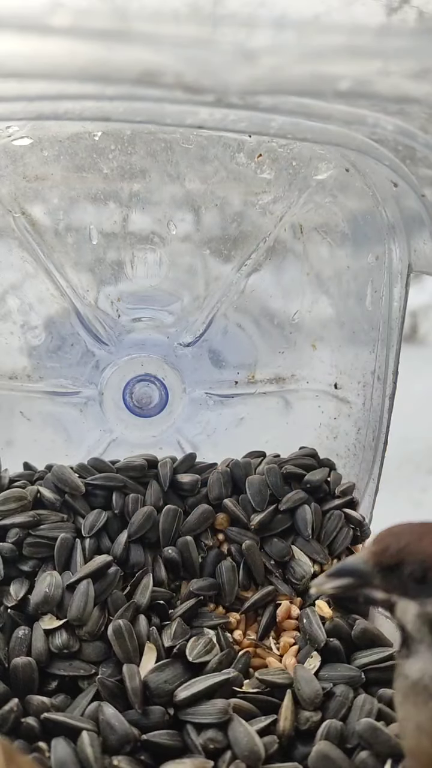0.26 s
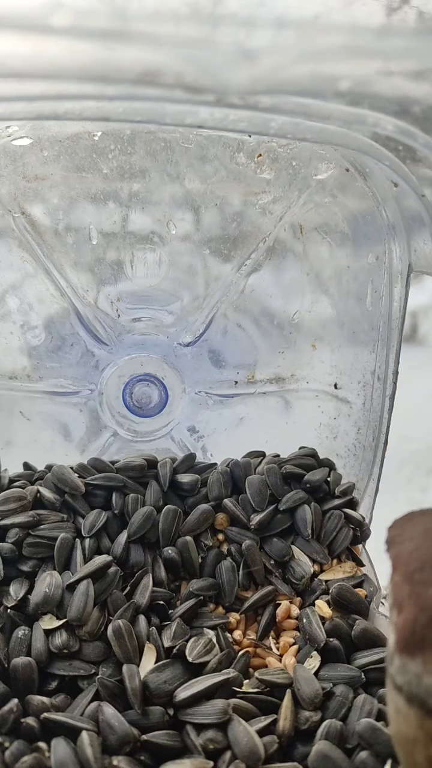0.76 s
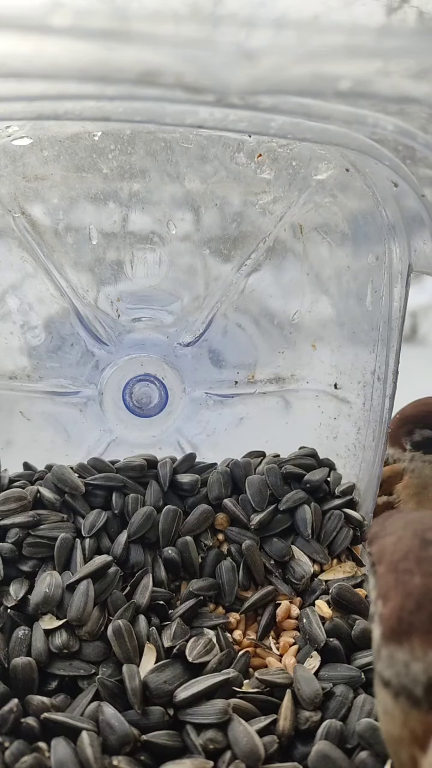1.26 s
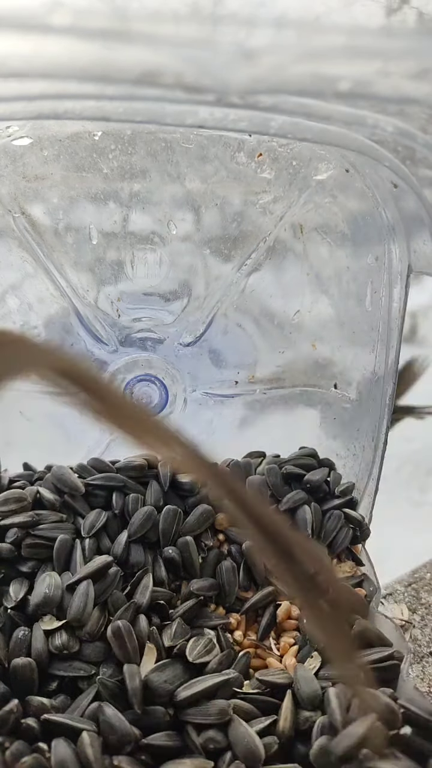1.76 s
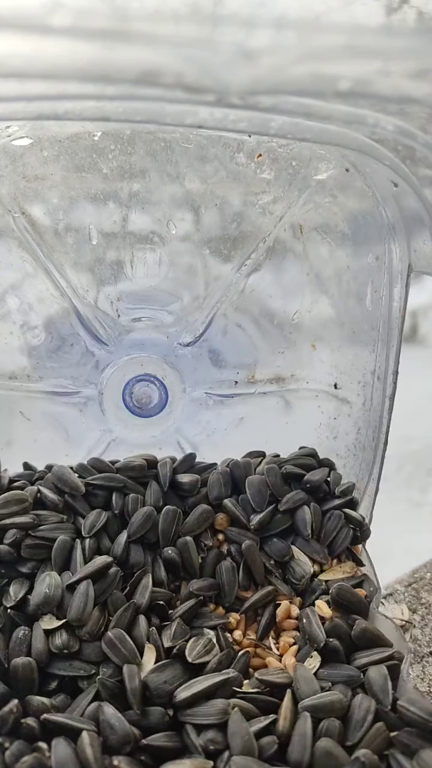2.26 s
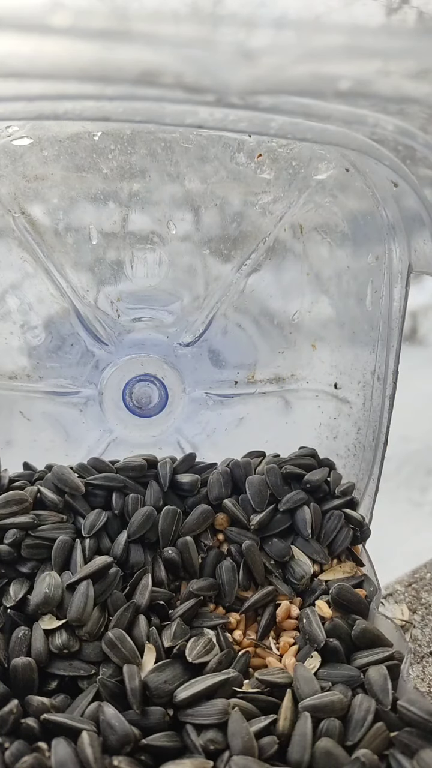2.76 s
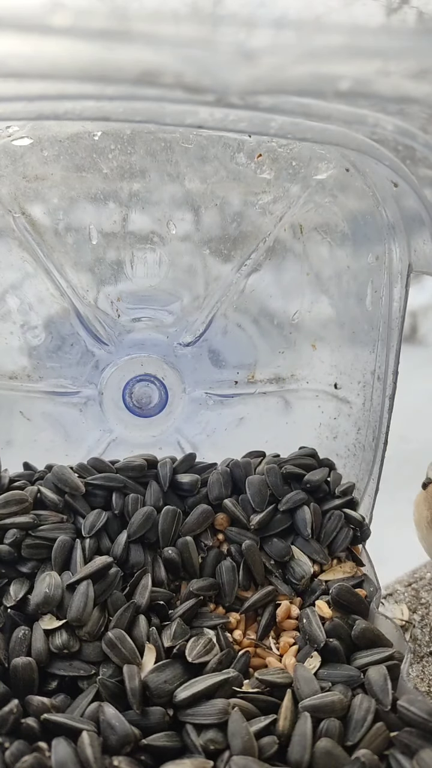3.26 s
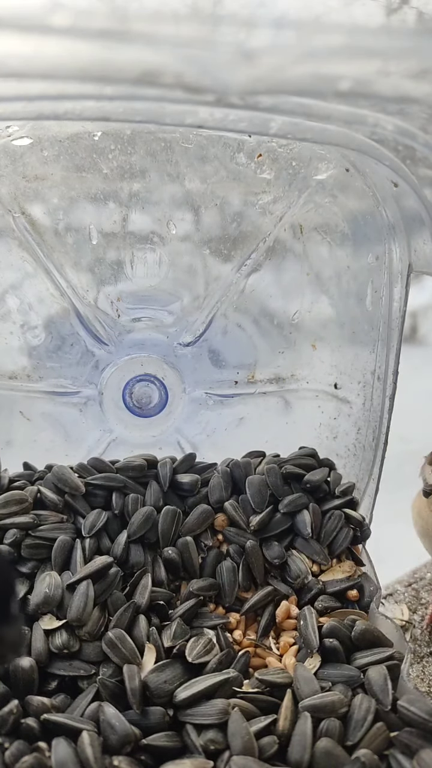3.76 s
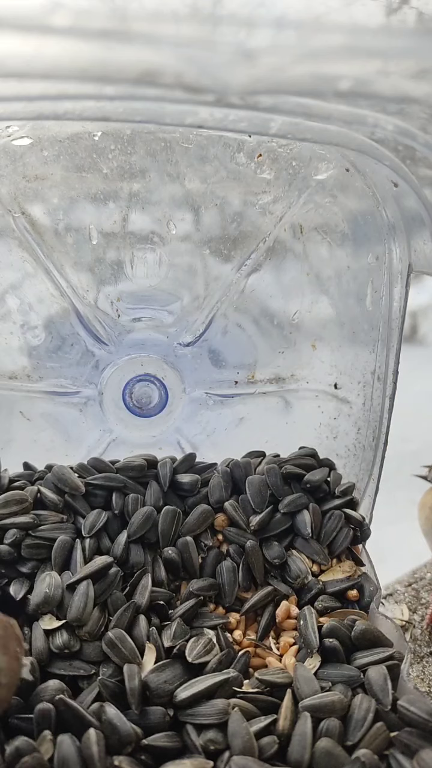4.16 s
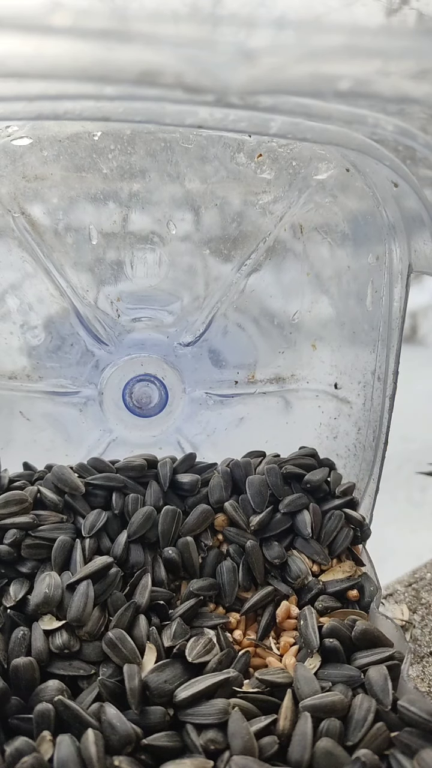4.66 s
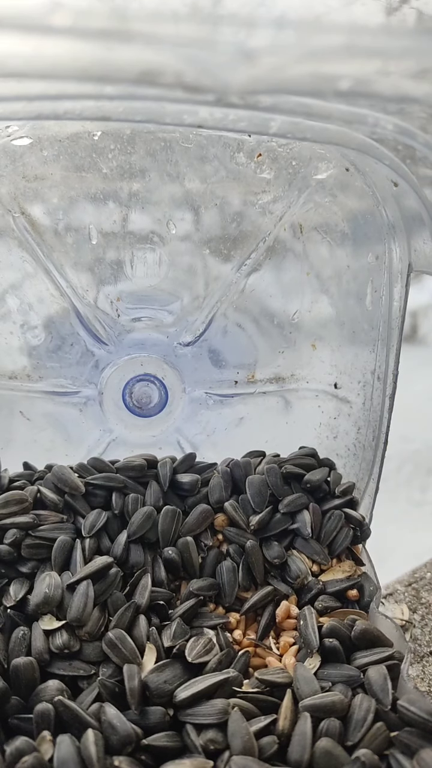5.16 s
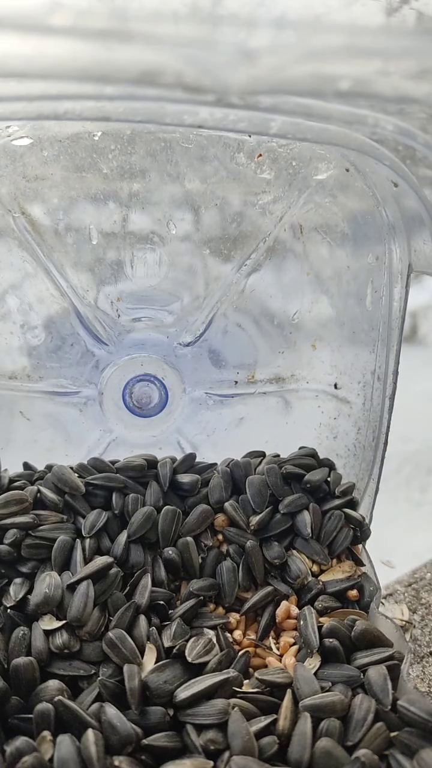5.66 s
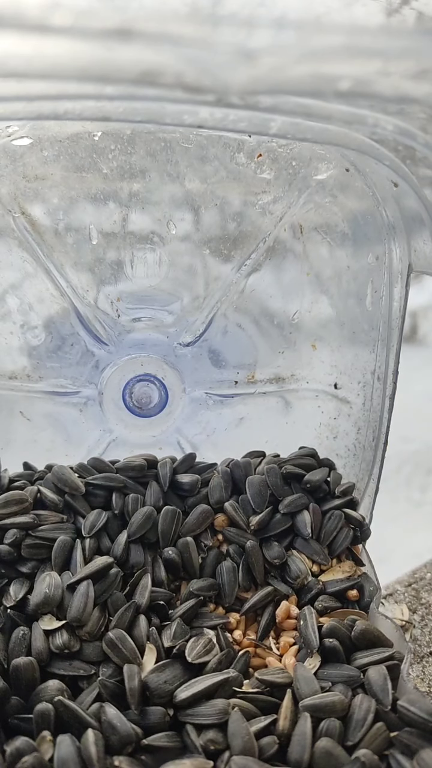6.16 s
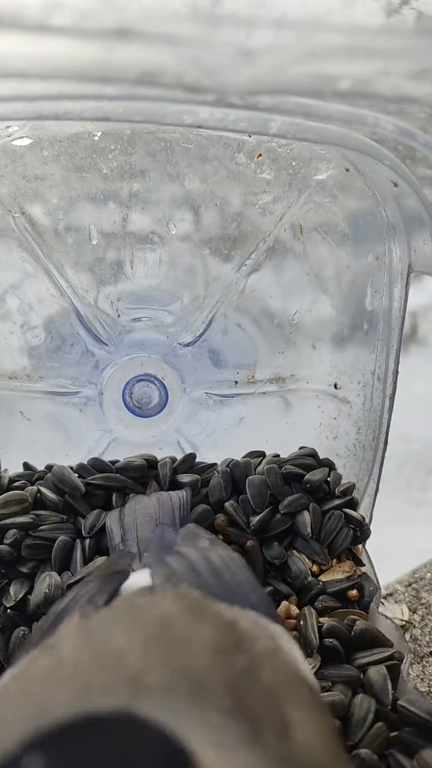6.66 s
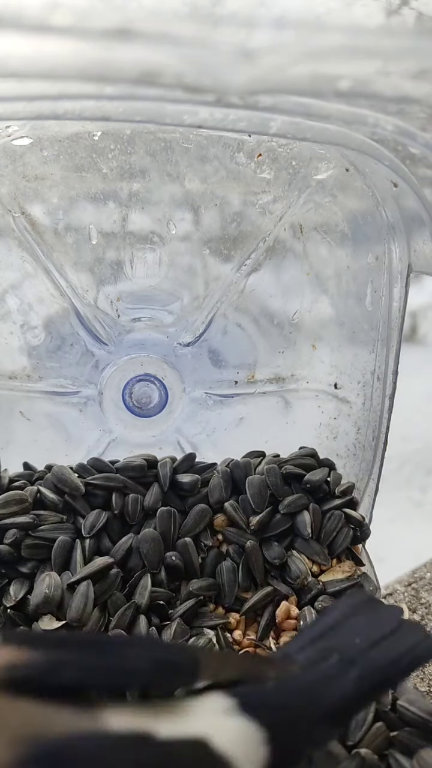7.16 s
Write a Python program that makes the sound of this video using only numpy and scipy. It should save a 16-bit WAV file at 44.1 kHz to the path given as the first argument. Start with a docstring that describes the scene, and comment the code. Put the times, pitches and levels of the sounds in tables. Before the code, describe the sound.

Close inside a plastic feeder, sparrows rustle and snap sunflower husks, knock the hollow wall, and flap off in low airy puffs.

```python
"""Small birds feed on seeds in a plastic bottle outdoors: filtered noise gives the murmur, thin hiss and wind.
From the start seeds rustle and patter as grains of impact; rasping sweeps and knocks on the wall soon follow.
Wing beats then puff the air in pulses of pressure, and far birds call in gliding whistles.
Later, husks creak, snap and ring as short modes excited by bursts of impacts, alone or in spells of nibbling."""
import sys
import numpy as np
from scipy import signal
from scipy.fft import rfft, irfft, next_fast_len
from scipy.io import wavfile
from scipy.ndimage import uniform_filter1d

SR = 44100
rng = np.random.default_rng(int(sys.argv[2]) if len(sys.argv) > 2 else 0)


def wav_record(signal):
    """Record a signal, one row per channel, as 16-bit PCM in the file named by sys.argv[1]."""
    frames = np.transpose(np.atleast_2d(signal))
    bounded = np.clip(frames, -1, 1)
    # unit amplitude maps onto the largest positive 16-bit level
    quanta = np.round(bounded * 32767).astype(np.int16)
    wavfile.write(sys.argv[1], SR, quanta)


N = 326763

# Spectrum of the distant murmur in the bottle: frequency_hz, gain_db
AIR_SPECTRUM = [(25, 1), (100, -16.5), (240, -9.5), (436, -2), (510, -11), (650, -8), (770, -38.5),
                (1000, -25), (2700, -27.5), (5000, -30)]
# Spectrum of the thin hiss: frequency_hz, gain_db
HISS_SPECTRUM = [(800, -25), (2700, -19), (4200, -24.5), (6000, -13), (7610, -1), (9660, -16.5),
                 (14000, -22.5)]
# Course of the thin hiss: time_s, level_db
HISS_LEVELS = [(0, -66), (.35, -53), (.8, -63), (1.1, -56.5), (1.42, -72), (1.92, -52.5), (2.7, -64.5),
               (6.85, -59), (7.41, -60)]
# Spectrum of turbulent air, in wind and wing beats: frequency_hz, gain_db
GUST_SPECTRUM = [(12, -19), (28, 2), (50, -9), (95, -12.5), (140, -20), (220, -25), (330, -25), (900, -53)]
# Gusts of wind on the microphone: centre_s, level_db, half_width_s (to 1/e of the power)
BREEZES = [(.22, -40.5, 0.46), (3.05, -47.5, 0.18), (4.9, -46.5, 0.21), (6.3, -53, 0.48), (7.35, -48, 0.2)]
# Passing flights: nearest_beat_s, peak_db, loss_before_db_per_beat, loss_after_db_per_beat, wake_db
FLIGHTS = [(0.684, -38.5, 11, 16, -63), (1.579, -27, 25, 6, -48), (1.779, -11, 10.5, 24, -29.5),
           (2.374, -18.5, 8.5, 16, -37.5), (4.476, -29.5, 2, 17, -33.5), (5.516, -31.5, 8, 5, -35.5)]
# Spells of rummaging in the seeds: start_s, length_s, level_db (before flicker)
RUMMAGES = [(0, 0.34, -53), (0.63, 0.072, -60), (1.59, 0.25, -46), (2.736, 0.053, -52),
            (2.843, 0.43, -60.5), (3.38, 0.21, -56), (4.053, 0.072, -58.5), (4.503, .49, -48),
            (5.047, 0.13, -46.5), (5.897, .15, -57), (6.303, .17, -57.5), (7.04, 0.073, -58.5),
            (7.171, 0.039, -43.5)]
# Beaks and claws striking the bottle: start_s, husk_crack_db, wall_clack_db, hollow_thump_db, decay_s
KNOCKS = [(0.258, -35, -36, -21, 0.004), (.27, -21.5, -45, -35, 0.0046), (1.77, -16.5, -23, -28.5, 0.0036),
          (1.812, -11, -19.5, -20, 0.004), (2.371, -53, -37.5, -27, 0.0053),
          (2.396, -24, -26.5, -26, 0.0058), (2.403, -16, -33, -18, 0.0034),
          (2.539, -37, -41.5, -36.5, 0.0014), (2.78, -36.5, -39, -37.5, 0.0043),
          (2.857, -36.5, -40, -31.5, 0.0071), (2.906, -46, -41.5, -37.5, 0.013),
          (2.935, -41, -46.5, -39.5, 0.0034), (3.209, -35.5, -44, -41.5, .003),
          (3.232, -27, -38, -41.5, 0.012), (3.292, -44.5, -41.5, -41.5, 0.0028),
          (3.434, -35.5, -38.5, -37, 0.0085), (3.452, -30.5, -34, -25.5, 0.0065),
          (3.57, -36, -47, -40.5, 0.0037), (3.591, -34.5, -43, -35.5, 0.0013),
          (4.079, -47, -46, -37, 0.0058), (4.118, -47, -52, -49, 0.0055), (4.239, -38, -46, -63, 0.018),
          (4.25, -34, -39, -39.5, .0016), (4.499, -8.5, -13, -11.5, 0.0053), (4.508, -16, -40, -16, 0.0044),
          (4.519, -20, -26, -29, .005), (4.529, -23, -20.5, -25.5, 0.002), (4.608, -30, -32, -26, 0.014),
          (4.62, -16, -27.5, -20.5, 0.0043), (4.631, -24, -26, -17.5, 0.013),
          (4.646, -26, -22, -21.5, .003), (4.719, -34, -38, -27, 0.0058),
          (4.744, -26.5, -24.5, -22.5, 0.0026), (4.801, -29.5, -38, -41, 0.036),
          (5.058, -32.5, -39.5, -39, 0.0029), (5.397, -25.5, -35, -32.5, 0.0029),
          (5.407, -26.5, -27, -20.5, 0.0047), (5.417, -18.5, -35, -25.5, 0.0036),
          (5.468, -33.5, -43, -61, 0.0018), (5.963, -38, -36, -34, 0.0047),
          (5.985, -37, -35.5, -26.5, 0.0046), (6.006, -39, -41.5, -54, 0.0017), (6.26, -51, -50, -45, .002),
          (6.333, -38, -46, -45, .008), (6.358, -22.5, -36, -33, 0.0064), (6.372, -36, -39, -24, 0.005),
          (7.155, -32, -25.5, -21.5, 0.0039), (7.171, -27.5, -31, -33, 0.0014),
          (7.208, -31, -47, -33.5, 0.0079), (7.302, -33, -31.5, -22, 0.0034),
          (7.349, -33, -50, -43, 0.0012)]
# Spectrum radiated by husks: frequency_hz, gain_db
HUSK_SPECTRUM = [(1500, -30), (3500, -21.5), (5100, -5.5), (6440, 0), (7000, 3.5), (7550, 8.5), (8500, 1.5),
                 (10000, -5), (14000, -16)]
# Spectrum radiated by the thin wall: frequency_hz, gain_db
WALL_SPECTRUM = [(120, -40.5), (300, -15.5), (700, 2.5), (1050, -2.5), (1280, -1), (1730, 1.5), (2000, 0),
                 (2550, 0.5), (2960, -1.5), (3700, 0), (5000, -9.5), (7000, -28), (14000, -36)]
# Modes of the bottle's hollow: ratio (multiple of the main note), relative_level_db, t60_s
BOTTLE_MODES = [(0.802, -68, 0.2), (0.901, -13, 0.12), (0.999, 14, 0.044), (1.47, 2, 0.058),
                (2.03, -13.5, 0.04)]
# Main note of the bottle, shifted as the birds load its wall: time_s, pitch_hz
BOTTLE_PITCHES = [(.26, 420), (1.81, 375), (2.86, 380), (4.5, 433), (4.63, 406.5), (5.41, 441), (5.99, 377),
                  (7.3, 405.5)]
# Feathers and feet sweeping over the seeds or the rim: peak_s, level_db, swell_s, fade_s
SWEEPS = [(0.074, -34.5, 0.017, 0.026), (0.2006, -12, 0.0016, 0.0029), (0.2366, -19, 0.0061, 0.0023),
          (.277, -30, 0.014, 0.011), (1.592, -37, .002, 0.016), (1.631, -38, 0.022, .025),
          (1.656, -31, 0.0059, 0.027), (1.696, -27, 0.0025, 0.019), (1.72, -34, 0.07, 0.066),
          (1.735, -13.5, .004, 0.0076), (1.806, -24, 0.018, 0.0083), (2.369, -31, 0.0017, 0.0025),
          (2.724, -48, .003, 0.011), (4.704, -30, 0.0026, 0.0092), (4.842, -31, 0.01, 0.016),
          (5.16, -28, 0.0017, 0.012), (5.373, -33, 0.0027, 0.024), (6.441, -27, 0.0064, 0.016)]
# Faint distant calls: start_s, length_s, start_hz, end_hz, level_db
CHIRPS = [(1.271, 0.032, 2650, 2900, -63.5), (2.013, 0.069, 2150, 2460, -64.5),
          (2.032, 0.037, 2550, 2880, -65), (5.722, 0.082, 4950, 4500, -58), (5.75, 0.045, 4350, 4300, -57),
          (5.792, 0.021, 4150, 3650, -58)]
# Clear snaps of hard husks: start_s, relative_level_db, pitch_hz, decay_s
TICKS = [(2.435, -34.5, 8250, .002), (2.582, -39, 7800, 0.0017), (3.24, -22.5, 7500, 0.002),
         (3.368, -27.5, 7400, 0.0063), (3.474, -32.5, 7940, 0.0011), (3.555, -31.5, 7500, 0.012),
         (3.608, -32.5, 7450, 0.0036), (3.647, -33.5, 8350, 0.0022), (3.765, -20, 7500, 0.0016),
         (3.782, -21, 8950, 0.0014), (3.803, -37, 8600, 0.0063), (3.813, -19.5, 8840, 0.00058),
         (3.956, -31.5, 8060, 0.0057), (4.06, -33.5, 7400, .006), (4.164, -30, 8000, 0.0019),
         (4.181, -31.5, 7640, 0.0025), (4.596, -29.5, 7900, 0.0028), (4.843, -24.5, 7460, 0.0021),
         (5.033, -36, 7600, 0.0022), (5.142, -28.5, 7400, 0.0038), (5.242, -16.5, 7700, 0.00202),
         (5.299, -34, 7540, 0.0072), (5.322, -33.5, 7300, .0013), (5.513, -32.5, 7240, 0.013),
         (5.543, -31, 8600, 0.029), (5.683, -32, 7600, .001), (5.686, -17.5, 6900, 0.0024),
         (5.704, -23, 7600, 0.0037), (5.711, -22.5, 7000, 0.0023), (5.729, -27.5, 7100, 0.0023),
         (5.821, -33, 7360, 0.0014), (5.851, -28, 7900, 0.0032), (6.098, -32.5, 7500, 0.0034),
         (6.152, -26.5, 8750, 0.0035), (6.23, -35, 7300, 0.0076), (6.414, -23.5, 7400, 0.018),
         (6.484, -32.5, 7650, 0.0032), (7.13, -35.5, 7800, 0.0032)]
# Spectrum of a snapping husk: frequency_hz, gain_db
TICK_SPECTRUM = [(200, -14.5), (1900, -17), (3400, -11), (5000, -9), (6300, -4), (7400, 10.5), (8700, 13.5),
                 (9900, 6), (14000, -2.5)]
# Spells of nibbling: start_s, end_s, relative_level_db (before scatter)
NIBBLES = [(2.551, 3.17, -44.5), (3.499, 3.745, -42), (3.979, 4.379, -36.5), (5.917, 6.207, -37.5),
           (6.518, 6.799, -42)]

AIR_DB, CALM_DB = -58, -58  # murmur; wind between gusts
WAKE_RISE_S, WAKE_FADE_S = 0.082, 0.093
IDLE_DB, CARRIED_DB = -69, -2.5  # stirring that never stops; force on the wall before the motion gain
RUMMAGE_ATTACK_S, RUMMAGE_RELEASE_S = 0.04, 0.032
SETTLE_DB, SETTLE_S = -29, 0.04  # seeds sliding after a knock: level against its thump, and fade
PATTER_DB, PATTER_PER_S = 1, 45  # tumbling seeds: level before the motion gain, and mean rate
TOUCH_DB, TOUCH_S = -25.5, 0.0023  # graze before a blow: level against husk and wall, and swell
WINGBEAT_S, PUFF_S = .048, 0.0033  # time between beats; time scale of one push of air
GIVE_DB, GIVE_S = -25, 0.0015  # creak before a snap: level against its table level, and swell
NIBBLE_HZ, NIBBLE_DECAY_S, NIBBLE_SCATTER_DB = 7400, .0032, 4.5  # central pitch and decay; most scatter
BLOW_S = .005  # reference duration for the energy of short sounds
TOP_HZ = 13900  # top of the recorded band


def undb(db):
    """Logarithmic level: convert decibels to an amplitude ratio."""
    return 10 ** (np.asarray(db) / 20)


def level(x, db):
    """Mean power: scale a lasting sound to an rms level."""
    return x * undb(db) / np.sqrt(np.mean(x ** 2))


def blow(x, db):
    """Impulse energy: match that of BLOW_S seconds at the given rms level."""
    return x * undb(db) * np.sqrt(BLOW_S * SR / np.sum(x ** 2))


def curve(table, axis):
    """Linear interpolation: join one column of a table in time."""
    rows = np.array(table)
    return np.interp(np.arange(N) / SR, rows[:, 0], rows[:, axis])


def add(out, s, x):
    """Superposition: mix in a sound that starts at s."""
    start = int(s * SR)
    lo, hi = max(start, 0), min(start + len(x), N)
    out[lo:hi] += x[lo - start:hi - start]


def colour(x, points, ripple_db=0, count=70):
    """Minimum-phase filtering: a spectrum with random ripple for the resonances of one contact spot."""
    n = 2 * next_fast_len(len(x) // 2 + 1)
    f = np.arange(n // 2 + 1) * SR / n
    hz, db = np.transpose(points)
    ripple_knots = np.linspace(0, np.sqrt(SR / 2), count)
    ripple = np.interp(np.sqrt(f), ripple_knots, rng.standard_normal(count))
    gain_db = np.interp(np.log(f + 1), np.log(hz), db) + ripple_db * ripple
    # folding the cepstrum onto positive time makes the filter causal
    cepstrum = irfft(np.log(undb(gain_db)))
    cepstrum[1:n // 2] *= 2
    cepstrum[n // 2 + 1:] = 0
    response = np.exp(rfft(cepstrum))
    return irfft(rfft(x, n) * response)[:len(x)]


def ring(t, hz, t60):
    """Damped oscillation: one mode falls by 60 dB in t60 seconds."""
    return np.sin(2 * np.pi * hz * t) * np.exp(-np.log(1000) * t / t60)


def grains(n, rate, spread_db):
    """Random impulse process: tiny impacts of uneven size, rate per second on average."""
    hit = rng.random(n) < rate / SR
    sign = rng.choice([-1, 1], n)
    return hit * sign * undb(spread_db * np.clip(rng.standard_normal(n), -2, 2))


def flicker(rate, depth_db):
    """Random modulation: a gain moves between random knots, rate per second."""
    knots = rng.standard_normal(4096)
    wander = np.interp(np.arange(N) / SR * rate, np.arange(len(knots)), np.clip(knots, -2, 2))
    return undb(depth_db * wander)


def swell(s, hold, attack, release):
    """Exponential envelope: rise towards s, hold, and die away."""
    t = np.arange(N) / SR - s
    return np.exp(np.clip(np.minimum(t / attack, (hold - t) / release), -20, 0))


def hollow(t, hz):
    """Modal superposition: each excitation shifts and weights the bottle's modes a little."""
    out = np.zeros(len(t))
    for ratio, db, t60 in BOTTLE_MODES:
        gain = undb(db + 3 * rng.uniform(-1.2, 1))
        mode_hz = hz * ratio * (1 + .012 * rng.standard_normal())
        out += gain * ring(t, mode_hz, t60)
    return out


def contact(t, decay, impacts, rise, echo_db):
    """Impact clustering: a crush of impacts, so many per decay time, with quick wall reflections."""
    force = grains(len(t), impacts / decay, spread_db=4.0)
    force[int(rise * SR)] = 0.97  # the first firm touch
    crush_envelope = np.exp(-t / decay) * (1 - np.exp(-(t + 1 / SR) / rise))
    crush = blow(force * crush_envelope, 0)
    echo_envelope = np.exp(-t / 0.0083) * (1 - np.exp(-t / 0.0007))
    echoes = blow(rng.standard_normal(len(t)) * echo_envelope, echo_db)
    return crush + echoes


def creak(swell_s, size=1024):
    """Progressive fracture: tiny impacts and faint noise grow towards the end."""
    t = (np.arange(size) - size) / SR
    fractures = grains(size, rate=6900, spread_db=4) + 0.046 * rng.standard_normal(size)
    return fractures * np.exp(t / swell_s)


def draught():
    """Addition of power: slow gusts and the wake of each flight over a calm."""
    t = np.arange(N) / SR
    gusts = sum(undb(db) ** 2 * np.exp(-((t - s) / width) ** 2) for s, db, width in BREEZES)
    wakes = sum((undb(db) * swell(s, 0, WAKE_RISE_S, WAKE_FADE_S)) ** 2 for s, _, _, _, db in FLIGHTS)
    return np.sqrt(gusts + wakes + undb(CALM_DB) ** 2)


def outdoors():
    """Broadband noise: a distant murmur in the bottle, a thin hiss, and lumpy wind on the microphone."""
    air = level(colour(rng.standard_normal(N), AIR_SPECTRUM), AIR_DB)
    hiss = level(colour(rng.standard_normal(N), HISS_SPECTRUM), 0) * undb(curve(HISS_LEVELS, axis=1))
    lumps = flicker(rate=18, depth_db=2.5)
    wind = level(colour(rng.standard_normal(N), GUST_SPECTRUM) * lumps, 0) * draught()
    return air + hiss + wind


def stirring():
    """Energy decay: seeds move in jerky spells of rummaging and slide on briefly after every knock."""
    spells = np.zeros(N)
    for s, length, db in RUMMAGES:
        spells += (undb(db) * swell(s, length, RUMMAGE_ATTACK_S, RUMMAGE_RELEASE_S)) ** 2
    jolts = np.zeros(N)
    for s, _, _, thump_db, _ in KNOCKS:
        jolts[int(s * SR)] = undb(thump_db + SETTLE_DB) ** 2
    settling = signal.lfilter([1], [1, -np.exp(-2 / (SETTLE_S * SR))], jolts)
    return np.sqrt(spells + settling + undb(IDLE_DB) ** 2) * flicker(rate=41, depth_db=3)


def rustle(size=4096, count=7):
    """Granular friction: sliding seeds excite husks of several pitches, the wall and the hollow."""
    fits = flicker(rate=80, depth_db=5)
    t, motion = np.arange(size) / SR, stirring()
    scratch = level(grains(N, rate=3000, spread_db=7.5) * fits, 0)
    shells = np.zeros(N)
    for hz in np.linspace(6500, 9000, count):
        hits = grains(N, rate=27, spread_db=5.5) * fits
        shells += signal.fftconvolve(hits, ring(t, hz, t60=0.005))[:N]
    husks = (level(colour(scratch, HUSK_SPECTRUM), -1.0) + level(shells, -4)) * motion
    push = level(grains(N, rate=1200, spread_db=4.5) * fits, CARRIED_DB) * motion
    push_db = 10 * np.log10(np.mean(push ** 2))
    wall = level(colour(push, WALL_SPECTRUM), push_db - 5.0)
    boom = level(signal.fftconvolve(push, hollow(t, hz=428.6))[:N], push_db + 2.5)
    return husks + wall + boom


def patter(size=512):
    """Separate collisions: loose seeds tumble one by one, ticking on each other and on the wall."""
    t = np.arange(size) / SR
    drops = grains(N, rate=PATTER_PER_S, spread_db=5.5)
    clatter = signal.fftconvolve(drops, np.exp(-t / .0016))[:N] * rng.standard_normal(N)
    husks = level(colour(clatter, HUSK_SPECTRUM), 0)
    wall = level(colour(clatter, WALL_SPECTRUM), db=-10.5)
    return (husks + wall) * undb(PATTER_DB) * stirring()


def sweeps(size=8192):
    """Stick-slip friction: feather barbs and claws rasp in a swell and fade, coloured by the bottle."""
    out, t = np.zeros(N), (np.arange(size) - size // 2) / SR
    for s, db, swell_s, fade_s in SWEEPS:
        catches = flicker(rate=350, depth_db=3)[:size]
        rasp = grains(size, rate=12000, spread_db=4.5) * catches
        hollow_ring = signal.fftconvolve(rasp, hollow(t - t[0], hz=429))[:size]
        bright = level(colour(rasp, HUSK_SPECTRUM, ripple_db=1.5), -2.8)
        dull = level(colour(rasp, WALL_SPECTRUM, ripple_db=3.5), -9.5) + level(hollow_ring, -8)
        envelope = np.exp(np.minimum(t / swell_s, -t / fade_s))
        add(out, s + t[0], undb(db) * (bright + dull) * envelope)
    return out


def knocks(size=4096):
    """Impact excitation: a blow cracks among the husks, clacks on the thin wall and thumps the hollow."""
    out, t = np.zeros(N), np.arange(size) / SR
    build = 1 - np.exp(-t / .0018)  # the air in the bottle takes about one cycle to get going
    for s, husk_db, wall_db, thump_db, decay in KNOCKS:
        force = contact(t, decay, impacts=26, rise=0.00071, echo_db=-14.5)
        crack = blow(colour(force, HUSK_SPECTRUM, ripple_db=2.0), husk_db)
        clack = blow(colour(force, WALL_SPECTRUM, ripple_db=3.0), wall_db)
        bottle_hz = np.interp(s, *np.transpose(BOTTLE_PITCHES))
        thump = blow(hollow(t, bottle_hz) * build, thump_db)
        add(out, s - .0004, crack + clack + thump)
        # claws and beak graze the seeds just before the blow lands
        touch = creak(TOUCH_S)
        graze = blow(colour(touch, HUSK_SPECTRUM), husk_db) + blow(colour(touch, WALL_SPECTRUM), wall_db)
        add(out, s - len(graze) / SR, undb(TOUCH_DB) * graze)
    return out


def puffs(size=8192, count=3):
    """Pressure pulses: wing beats push and draw the air with small eddies, louder as the bird nears."""
    out, t = np.zeros(N), (np.arange(size) - size // 2) / SR
    u = t / PUFF_S
    push = -2.6 * u / (1 + u ** 2) ** 1.5  # peaks close to 1
    for s, db, before_db, after_db, _ in FLIGHTS:
        for beat in range(-count, count + 1):
            lost_db = max(-beat * before_db, beat * after_db)
            turbulence = level(colour(rng.standard_normal(size), GUST_SPECTRUM), db=-5.5)
            eddies = turbulence * np.exp(-np.abs(u) / 3)
            add(out, s + beat * WINGBEAT_S + t[0], undb(db - lost_db) * (push + eddies))
    return out


def chirps():
    """Frequency modulation: far birds give wavering whistles that glide."""
    out = np.zeros(N)
    for s, length, start_hz, end_hz, db in CHIRPS:
        n = int(length * SR)
        waver = level(uniform_filter1d(rng.standard_normal(n), size=70), -32.5)
        pitch_hz = np.linspace(start_hz, end_hz, n) * (1 + waver)
        phase = 2 * np.pi * np.cumsum(pitch_hz) / SR
        add(out, s, level(np.sin(phase) * np.sqrt(np.hanning(n)), db))
    return out


def nibbles(count=6):
    """Irregular timing: a beak turns a seed, with faint ticks spread over each spell as rows like TICKS."""
    rows = []
    for start, end, db in NIBBLES:
        for k, (late, loud, high, slow) in enumerate(rng.uniform(-1, 1, (count, 4))):
            s = start + (end - start) * (k + .5 + .5 * late) / count
            hz = NIBBLE_HZ * (1 + .07 * high)
            rows.append((s, db + NIBBLE_SCATTER_DB * loud, hz, NIBBLE_DECAY_S * 2 ** slow))
    return rows


def ticks(size=2048):
    """Brittle fracture: a husk creaks, snaps and rings briefly at its own pitch; slow ones crackle."""
    out, t = np.zeros(N), np.arange(size) / SR
    for s, db, hz, decay in TICKS + nibbles():
        force = contact(t, decay, impacts=18, rise=.0006, echo_db=-18)
        snap = colour(force, TICK_SPECTRUM, ripple_db=3.0)
        shell = signal.fftconvolve(snap, ring(t, hz, t60=0.0012))[:size]
        add(out, s - .0003, blow(blow(snap, 0.34) + blow(shell, 0), db + 0.92))
        give = blow(colour(creak(GIVE_S), HUSK_SPECTRUM), db + GIVE_DB)
        add(out, s - len(give) / SR, give)
    return out


def scene():
    """Linear superposition: everything heard from inside the feeder, on one channel."""
    seeds = rustle() + patter() + ticks()
    birds = sweeps() + knocks() + puffs()
    return (outdoors() + seeds + birds + chirps())[None]


def record(dry):
    """Saturation and band limiting: the recorder rounds the highest peaks and cuts the top."""
    ceiling = .8  # full scale is 1
    rounded = ceiling * np.tanh(dry / ceiling)
    lowpass = signal.ellip(8, .2, 70, TOP_HZ, fs=SR, output="sos")
    return signal.sosfilt(lowpass, rounded)


dry = scene()
out = record(dry)
wav_record(out)
```